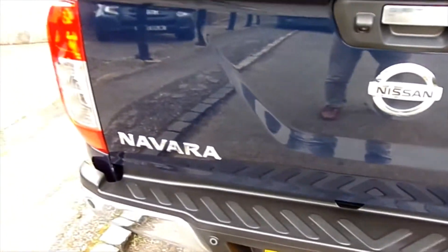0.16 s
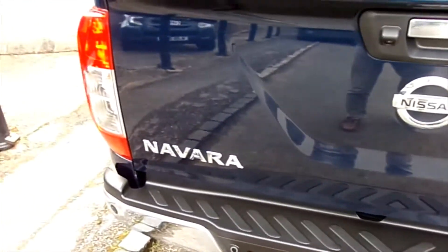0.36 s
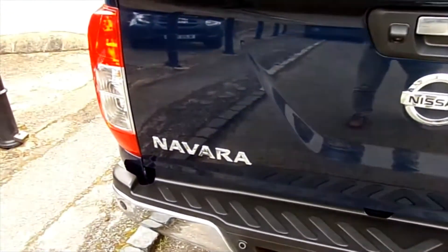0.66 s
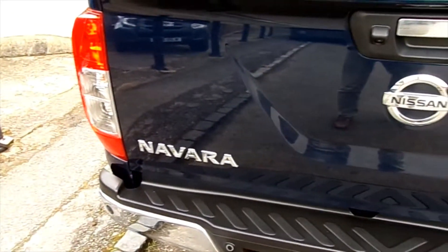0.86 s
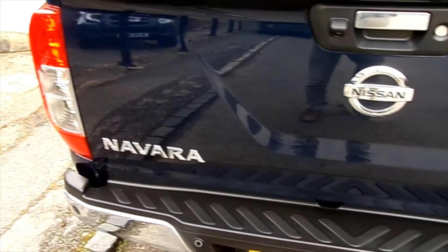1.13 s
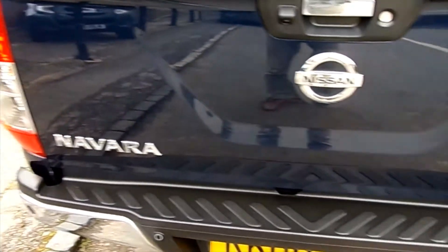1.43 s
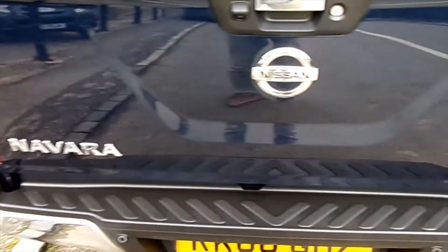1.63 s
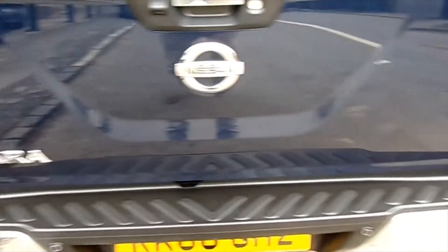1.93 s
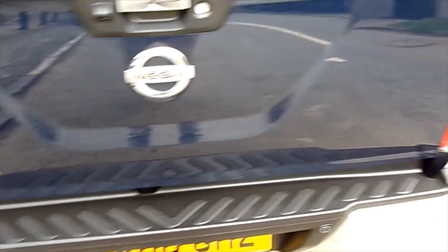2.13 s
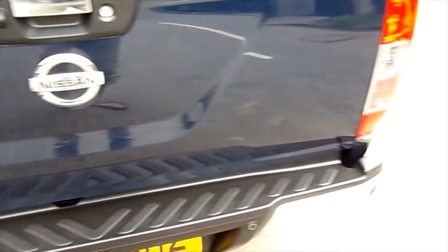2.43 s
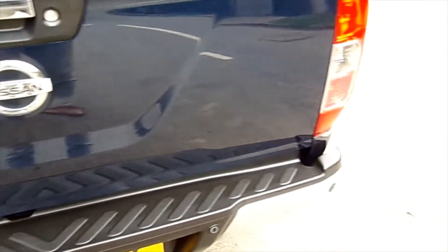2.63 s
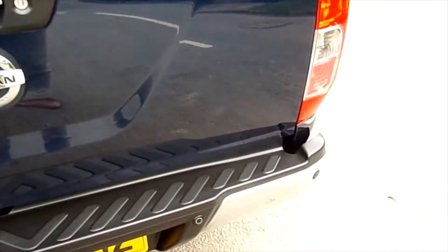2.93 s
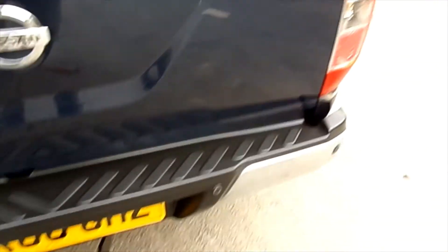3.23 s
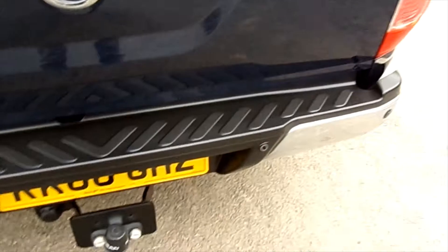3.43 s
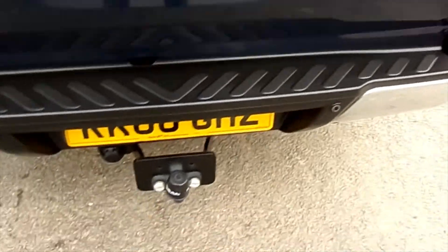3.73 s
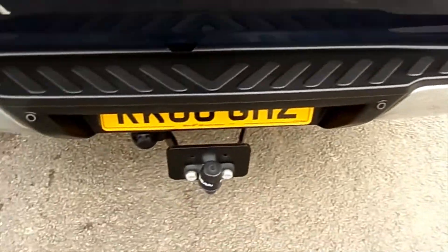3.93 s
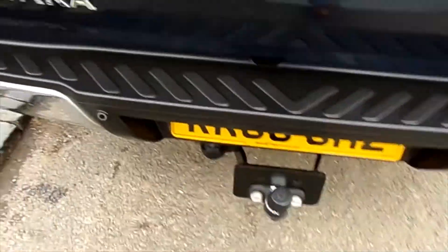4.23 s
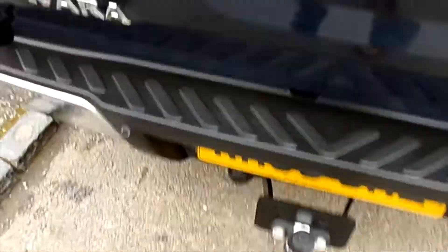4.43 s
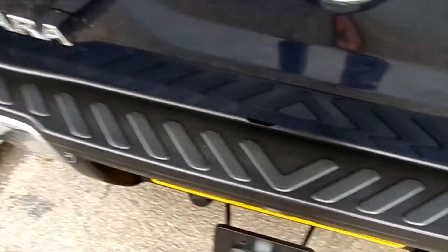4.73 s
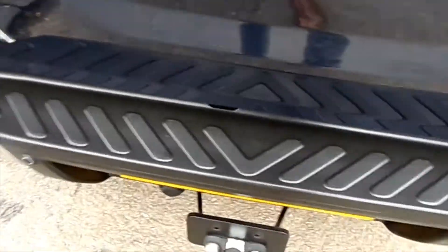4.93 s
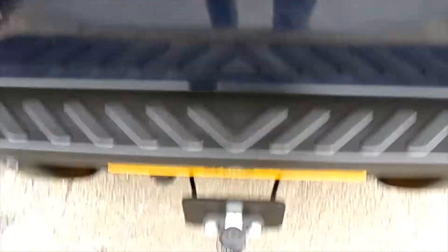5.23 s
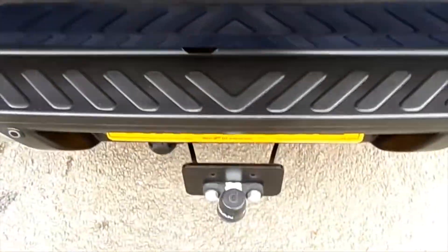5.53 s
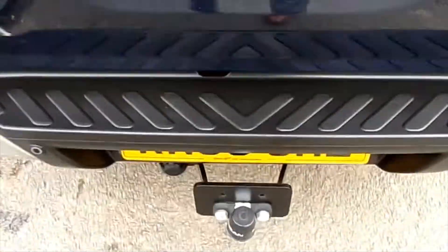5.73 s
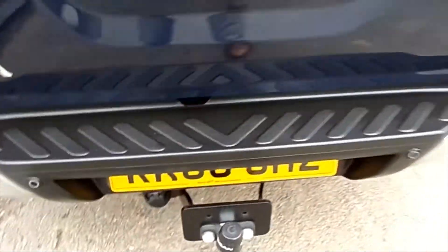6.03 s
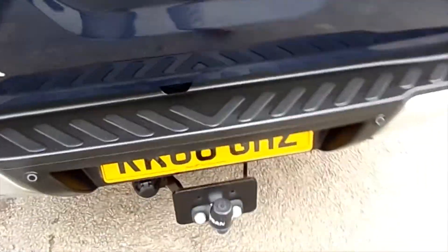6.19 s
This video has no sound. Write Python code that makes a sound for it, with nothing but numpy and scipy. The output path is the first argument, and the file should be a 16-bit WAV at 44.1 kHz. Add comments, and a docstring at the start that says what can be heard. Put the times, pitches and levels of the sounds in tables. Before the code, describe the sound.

Outdoors in a quiet street, distant cars wash past while small birds give short arched chirps and thin whistles. A few tiny handling clicks, dull knocks and soft bumps come close to the hand-held phone. Near the end a pickup's canopy door slams about a metre away, distorting the microphone, then chatters, rattles and echoes briefly as a last chirp sounds.

```python
"""Distant traffic swells and fades throughout, made of coloured noise; small birds call with gliding tones.
Early on come a few handling clicks, later joined by dull knocks and soft bumps: short bursts of noise.
Near the end a pickup's canopy door is slammed about a metre from a hand-held phone in a quiet street.
Its blows ring the panels and the latch, crash as noise and echo off the street; the microphone overloads.
The door also chatters on its seal, and loose hardware rattles out as cracks and pings."""
import sys
import numpy as np
from scipy import signal
from scipy.fft import rfft, irfft
from scipy.io import wavfile
from scipy.ndimage import uniform_filter1d

SR = 44100
rng = np.random.default_rng(int(sys.argv[2]) if len(sys.argv) > 2 else 0)


def store_pcm(level_fs):
    """Save levels as 16-bit WAV."""
    pcm = np.round(np.clip(level_fs, -1, 1) * 32767).astype(np.int16)
    wavfile.write(sys.argv[1], SR, np.atleast_2d(pcm).T)


N = 280476
TIME = np.arange(N) / SR  # seconds

# Blows of the slam: latch and seal, one hard rebound, then the door drops into its catch.
# Levels are relative, before the mix in slam(): start_s, panel_push_db, metal_crash_db
SLAM_BLOWS = [(5.8258, -40, -45), (5.8291, -29, -27), (5.8323, -34, -23), (5.839, -35, -24),
              (5.8431, -17.5, -20.5), (5.8485, -18, -17.5), (5.8528, -30.5, -20), (5.8626, -30, -41),
              (5.8965, -47, -30.5), (5.9555, -58, -33.5), (5.9597, -39.5, -38)]
# Ringing notes of the tailgate and canopy panels: pitch_hz, level_db, time_to_fall_60_db_s
PANEL_MODES = [(106, -12.5, 0.28), (178, 6, 0.048), (245.6, -6, 0.23), (313.6, -5, 0.15), (330, -2, 0.26),
               (371, -15.5, 0.16), (590, -1, 0.097), (626, -10, 0.12), (759, -14, 0.22), (903, -8, 0.11),
               (970, -10, 0.08), (1067, -7, 0.094), (1338, -24.5, 0.28), (1380, -27, 0.26)]
# Ringing notes of the steel latch and hinges: pitch_hz, level_db, time_to_fall_60_db_s
LATCH_MODES = [(2070, -14, 0.15), (2350, -2.5, 0.14), (2370, -0.5, 0.11), (2486, 4, 0.1), (2580, 0, 0.088),
               (2960, 4, 0.048), (3166, 4.5, 0.044), (3250, -19, 0.15), (3820, -1, 0.075),
               (3910, -2.5, 0.11), (4070, 4.5, 0.052), (4165, -2, 0.12), (4620, -16, 0.079),
               (4840, 2, 0.048), (4880, -14, 0.088), (6340, -6, 0.1)]
# Colour of the clashing metal: frequency_hz, level_db
CRASH_COLOUR = [(60, -4), (200, 2), (330, 1.5), (460, -13), (600, 3.5), (1050, 2), (1400, -3), (2000, -2),
                (2400, -4.5), (2800, -0.5), (4000, -3.5), (5500, -7), (7000, -7), (9000, -18), (15000, -17)]
# Colour of the street's echo: frequency_hz, level_db
STREET_COLOUR = [(30, -3), (100, 3.5), (220, 5.5), (330, 6), (450, -14.5), (620, 0), (1000, -7.5),
                 (2000, -12), (4000, -16), (7000, -20), (15000, -38)]
# From just after the main blows, through the rebound and catch, the door chatters on its seal
# at a steady rate, weakening as it goes
CHATTER_START_S, CHATTER_GAP_S = 5.878, 0.0172
CHATTER_PUSH_DB, CHATTER_CRASH_DB, CHATTER_FALL_DB_PER_S = -43, -34.5, 154

# Loudest ticks of loose hardware, before the lift in rattle(): start_s, level_db, pitch_hz
RATTLE_TICKS = [(5.9445, -50, 6400), (5.9755, -47, 3900), (6.0068, -42.5, 3210), (6.0472, -44, 3900),
                (6.0805, -52.5, 3900)]
# Colour of the rattle's cracks: frequency_hz, level_db
RATTLE_COLOUR = [(200, 8), (1100, -3), (1900, -7), (3200, 5), (4000, -4), (4900, -1), (6600, 0), (9000, -1),
                 (15000, -11)]
# Fainter ticks follow at uneven gaps as the hardware settles
SETTLE_START_S, SETTLE_GAP_S = 6.102, 0.024  # the gap is an average
SETTLE_DB, SETTLE_FALL_DB_PER_S, SETTLE_HZ = -57.5, 29, 6120

# Small clicks of handling: start_s, level_db, pitch_hz
HANDLING_CLICKS = [(.592, -53, 6700), (.5955, -46.5, 4720), (.6005, -47.5, 2660), (.6075, -52, 2920),
                   (.611, -45.5, 4780), (3.028, -45.5, 3020), (3.0402, -47.5, 3200), (4.7415, -56.5, 5330),
                   (4.8762, -48.5, 6120), (4.9075, -56, 5100)]
# Colour of the clicks: frequency_hz, level_db
CLICK_COLOUR = [(200, -8), (1100, -6), (1600, 2), (2100, 5.5), (3100, 1), (3900, -3.5), (4900, 5),
                (5700, -10), (6600, 3.5), (9000, -28), (15000, -20)]
# Dull knocks as the door is moved: start_s, level_db
DOOR_KNOCKS = [(3.042, -58), (4.8785, -41), (4.8845, -50), (4.9085, -49.5)]
# Colour of the knocks: frequency_hz, level_db
KNOCK_COLOUR = [(40, -7), (150, -31), (280, 12.5), (450, 4), (700, 12), (1200, -1), (2300, 6.5), (3300, 1),
                (5000, -15), (12000, -49)]
# Soft bumps of the hand-held phone: start_s, level_db
PHONE_BUMPS = [(3.095, -52), (3.622, -58), (4.785, -67), (4.866, -51), (4.92, -51.5)]
# Colour of the bumps: frequency_hz, level_db
BUMP_COLOUR = [(20, -2), (50, 0), (130, -12), (200, 3), (350, -25), (1000, -41)]

# Arched chirps, each led in by a lisp: start_s, level_db, top_pitch_hz, length_s, lisp_against_chirp_db
ARCHED_CHIRPS = [(0.793, -46.5, 4227, 0.12, -10), (1.57, -70.5, 3600, .043, -8),
                 (1.862, -69, 3710, .04, -3), (2.411, -49.5, 4230, .11, -8.5),
                 (3.743, -68.5, 3620, 0.054, -3), (3.987, -47.5, 4274, .11, -14.5),
                 (5.342, -50.5, 4103, .11, -10.5), (5.614, -65.5, 3070, 0.095, -22),
                 (6.195, -50, 4220, 0.098, -15.5)]
ARCH_DEPTH, ARCH_SKEW = 0.26, 0.78  # share of the top pitch lost at the ends; under 1 the top comes early
# The chirp's second voice: top against the first's; share of it lost at the ends
UNDER_RATIO, UNDER_DEPTH = 0.94, 0.27
# Each lisp starts just ahead of its chirp and runs into it
LISP_LEAD_S, LISP_S = 0.036, 0.056
# Lisp start against the chirp's top; shares by which its two voices climb
LISP_RATIO, LISP_CREEP, LISP_RISE = 1.115, 0.063, 0.3
# Short, clean chips: start_s, level_db, top_pitch_hz, length_s
CLEAN_CHIPS = [(.414, -58.5, 4290, 0.026), (2.046, -63, 4300, .04), (3.355, -68, 4050, 0.035)]
CHIP_DEPTH = 0.09  # share of the top pitch lost at the ends
# Thin whistles that drop onto a held note: start_s, level_db, held_pitch_hz, length_s
THIN_WHISTLES = [(3.15, -75.5, 6510, 0.1), (5.19, -68.5, 6400, 0.22), (5.425, -64.5, 6347, .2),
                 (5.666, -64.5, 6530, 0.16), (6.06, -60.5, 5390, .095)]
WHISTLE_DROP, WHISTLE_DROP_S = 0.2, 0.023  # starts this share above the held note; time constant of the fall

# Cars on a distant road; swell_s sets how slowly each comes and goes:
# nearest_s, swell_s, tyre_roar_db, hiss_db, engine_rumble_db, exhaust_drone_db
PASSING_CARS = [(1.15, 0.47, -56, -62, -60.5, -58.5), (2.3, .4, -59.5, -60.5, -73.5, -62.5),
                (3.25, 0.31, -71, -64.5, -68, -65), (3.8, 0.43, -63.5, -65.5, -72, -72),
                (4.5, 0.92, -62, -74.5, -63.5, -73.5), (6.3, 0.7, -60, -66.5, -63, -76)]
EXHAUST_LAG_S = 0.46  # the exhaust points backwards, so it is loudest after the car has passed
SCREENING = 1.566  # houses make the level fall faster than 1 / distance
TOWN_ROAR_DB, TOWN_HISS_DB, TOWN_RUMBLE_DB = -71, -65.5, -70.5  # steady wash behind the cars
HOWL_DB, HOWL_SWELL_S = -55.5, 0.21  # the first car's tyres howl while it is nearest
# Colour of the tyre roar: frequency_hz, level_db
TYRE_COLOUR = [(300, -32), (500, -14.5), (615, 1.5), (680, -6.5), (775, 0), (880, -2.5), (1040, 0),
               (1250, -9), (1700, -23), (3000, -50.5)]
# Colour of the road hiss: frequency_hz, level_db
HISS_COLOUR = [(700, -14.5), (1300, 6), (1800, 2), (2500, -2), (3400, -6.5), (4100, -10), (5000, -16.5),
               (6500, -18), (9000, -42), (15000, -14.5)]
# Colour of the engine rumble: frequency_hz, level_db
RUMBLE_COLOUR = [(20, -34), (45, -17), (90, -6.5), (150, -5), (215, -3), (270, -0.5), (350, -7), (480, -10),
                 (800, -32)]
# Colour of the exhaust drone: frequency_hz, level_db
DRONE_COLOUR = [(70, -28), (130, -8.5), (195, -1), (222, 6.5), (245, 6), (290, -60)]
# Colour of the tyre howl: frequency_hz, level_db
HOWL_COLOUR = [(500, -28), (620, 6.5), (680, -3.5), (755, 9), (790, 11), (860, -1), (1020, 0), (1300, -77)]

# The phone's microphone, with two narrow notches and a steep shelf: frequency_hz, level_db
MIC_RESPONSE = [(20, 0), (3590, 0), (3680, -15), (3770, 0), (4230, 0), (4380, -19), (4520, 0), (6700, 0),
                (7400, -9), (8000, -23), (15000, -21)]
OVERLOAD_DB, SELF_NOISE_DB, TOP_HZ = -19, -89.5, 15800


def slam():
    """Each blow rings the panels and clashes the steel latch; the street's echo dies away more slowly."""
    times, push_db, crash_db = np.vstack([SLAM_BLOWS, chatter()]).T
    push = impulses(times, push_db)
    clash = impulses(times, crash_db)
    panels = signal.fftconvolve(push, ring(PANEL_MODES))[:N]
    latch = signal.fftconvolve(clash, ring(LATCH_MODES))[:N]
    metal = noise(CRASH_COLOUR) * fade(clash, t60=0.033, rise=0.00054)
    echo = noise(STREET_COLOUR) * fade(push, t60=0.57, rise=0.017)
    return undb(-3.5) * panels + undb(-16.5) * latch + undb(0.5) * metal + undb(-18.5) * echo


def chatter(count=8, scatter_db=1.5):
    """Small bounces of the door on its seal lose strength on average, in rows like those of the slam."""
    t = CHATTER_GAP_S * np.arange(count)
    db = scatter_db * rng.standard_normal((count, 2)) + [CHATTER_PUSH_DB, CHATTER_CRASH_DB]
    db -= CHATTER_FALL_DB_PER_S * t[:, None]
    return np.column_stack([CHATTER_START_S + t, db])


def rattle():
    """Loose hardware knocks against itself after the slam; each contact cracks and pings."""
    rows = list(RATTLE_TICKS) + settling()
    return undb(3) * ticks(rows, RATTLE_COLOUR, t60=0.016, tone_db=-4, tone_t60=0.03, ring_db=-15)


def settling(count=6, uneven=0.13, scatter_db=0.5, detune=0.069):
    """The last faint hardware ticks vary in gap, level and pitch, in rows like those of the rattle."""
    late, loud, sharp = rng.standard_normal((count, 3)).T
    t = SETTLE_GAP_S * (np.arange(count) + uneven * late)
    db = SETTLE_DB - SETTLE_FALL_DB_PER_S * t + scatter_db * loud
    hz = SETTLE_HZ * (1 + detune * sharp)
    return list(zip(SETTLE_START_S + t, db, hz))


def clicks():
    """Small hard contacts of handling, each a crack with a brief ping."""
    return ticks(HANDLING_CLICKS, CLICK_COLOUR, t60=0.02, tone_db=1, tone_t60=0.015, ring_db=-26)


def knocks():
    """Moving the door gives dull thuds with no clear pitch."""
    return taps(DOOR_KNOCKS, KNOCK_COLOUR, t60=0.071, ring_db=-18, ring_t60=0.15)


def bumps():
    """The hand-held phone is bumped softly, giving mostly low-pitched noise."""
    return taps(PHONE_BUMPS, BUMP_COLOUR, t60=0.12, ring_db=-12, ring_t60=0.21)


def birds(echo_db=-7, echo_t60=0.47, wall_db=-6, wall_s=0.015, slide_db=-1.5, under_db=-6):
    """Small birds repeat a lisp and an arched chirp, others chip or whistle thinly; house fronts scatter them."""
    # Lisp and chirp have two voices: each side of the bird's voice box glides on its own
    lisps = [(s - LISP_LEAD_S, db + lisp_db, hz * LISP_RATIO, LISP_S)
             for s, db, hz, _, lisp_db in ARCHED_CHIRPS]
    upper = [row[:4] for row in ARCHED_CHIRPS]
    under = [(s, db + under_db, hz * UNDER_RATIO, length) for s, db, hz, length in upper]
    dry = song(lisps, climb(LISP_CREEP), attack=.15, release=.5, buzz_hz=170, buzz_depth=.008, rasp=.014)
    slide = song(lisps, climb(LISP_RISE), attack=.4, release=.3, buzz_hz=170, buzz_depth=.04, rasp=.045)
    dry += undb(slide_db) * slide
    dry += song(upper, arch(ARCH_DEPTH), attack=.3, release=.33, buzz_hz=440, buzz_depth=.055, rasp=.017)
    dry += song(under, arch(UNDER_DEPTH), attack=.1, release=.12, buzz_hz=440, buzz_depth=.02, rasp=.02)
    dry += song(CLEAN_CHIPS, arch(CHIP_DEPTH), attack=.2, release=.2, buzz_hz=170, buzz_depth=.002, rasp=.003)
    dry += song(THIN_WHISTLES, drop, attack=.05, release=.3, buzz_hz=58.4, buzz_depth=.003, rasp=.008)
    # The nearest wall returns a late copy that overlaps each glide and beats with it
    near = np.interp(TIME - wall_s, TIME, dry)
    walls = rng.standard_normal(SR) * np.exp(-np.log(1000) * TIME[:SR] / echo_t60)
    echo = signal.fftconvolve(dry, walls / np.linalg.norm(walls))[:N]
    return dry + undb(wall_db) * near + undb(echo_db) * echo


def song(calls, glide, attack, release, buzz_hz, buzz_depth, rasp):
    """Gliding notes, shaken in pitch by a fast trill and an uneven rasp; attack and release are length shares."""
    out = np.zeros(N)
    for start, db, pitch, length in calls:
        t = TIME[:int(length * SR)]
        done = t / length
        jitter = unit(butter(rng.standard_normal(SR), 400, "low"))[:len(t)]
        trill = np.sin(2 * np.pi * (buzz_hz * t + rng.random()))
        hz = pitch * glide(t, done) * (1 + buzz_depth * trill + rasp * jitter)
        envelope = np.minimum(np.minimum(done / attack, (1 - done) / release), 1)
        call = undb(db) * envelope * np.sin(2 * np.pi * np.cumsum(hz) / SR)
        first = int(start * SR)
        out[first:first + len(t)] += call[:N - first]
    return out


def arch(depth):
    """A glide that rises to the top pitch and falls back, `depth` lower at both ends."""
    return lambda t, done: 1 - depth * (1 - np.sin(np.pi * done ** ARCH_SKEW))


def climb(share):
    """A glide that rises evenly by `share` of its pitch."""
    return lambda t, done: 1 + share * done


def drop(t, done):
    """A glide that falls quickly onto a held note."""
    return 1 + WHISTLE_DROP * np.exp(-t / WHISTLE_DROP_S)


def traffic(flutter_db=0.47):
    """Cars some streets away swell and fade over the town's wash: tyres first, then engine and exhaust."""
    nearest, swell_s, roar_db, hiss_db, rumble_db, drone_db = np.transpose(PASSING_CARS)
    ahead = np.array([swell(s, width) for s, width in zip(nearest, swell_s)])
    behind = np.array([swell(s + EXHAUST_LAG_S, width) for s, width in zip(nearest, swell_s)])

    def together(db, gains):
        """Separate cars add by power."""
        return np.sqrt(undb(db) ** 2 @ gains ** 2)

    layers = [(TYRE_COLOUR, np.hypot(together(roar_db, ahead), undb(TOWN_ROAR_DB))),
              (HISS_COLOUR, np.hypot(together(hiss_db, ahead), undb(TOWN_HISS_DB))),
              (RUMBLE_COLOUR, np.hypot(together(rumble_db, behind), undb(TOWN_RUMBLE_DB))),
              (DRONE_COLOUR, together(drone_db, behind)),
              (HOWL_COLOUR, undb(HOWL_DB) * swell(nearest[0], HOWL_SWELL_S))]
    # The level of each layer wanders slightly on its own
    return sum(noise(colour) * gain * undb(flutter_db * walk(11)) for colour, gain in layers)


def swell(nearest_s, swell_s):
    """Gain of a car driving past on a straight road, 1 when it is nearest."""
    return np.hypot(1, (TIME - nearest_s) / swell_s) ** -SCREENING


def ticks(rows, colour, t60, tone_db, tone_t60, ring_db):
    """Light contacts of hard parts: each cracks and pings at its own pitch."""
    out = taps([row[:2] for row in rows], colour, t60, ring_db, ring_t60=0.1)
    for s, db, hz in rows:
        first = int(s * SR)
        out[first:first + SR] += ring([(hz, db + tone_db, tone_t60)])[:N - first]
    return out


def taps(rows, colour, t60, ring_db, ring_t60):
    """Small impacts: a short crack and a weaker after-ring, both of noise."""
    blows = impulses(*np.transpose(rows))
    crack = fade(blows, t60, rise=0.00036)
    after_ring = undb(ring_db) * fade(blows, ring_t60, rise=0.0025)
    return noise(colour) * (crack + after_ring)


def ring(modes):
    """One second of free vibration; neighbours in the list move in opposite directions, so close pairs swell."""
    t = TIME[:SR]
    out = np.zeros(SR)
    for k, (hz, db, t60) in enumerate(modes):
        decay = np.exp(-np.log(1000) * t / t60)
        out += (-1) ** k * undb(db) * np.sin(2 * np.pi * hz * t) * decay
    return out


def fade(blows, t60, rise):
    """Amplitude of a dense ring: each blow adds energy, which spreads in `rise` s and then drains away."""
    keep = np.exp(-np.log(1e6) / (t60 * SR))
    spread = np.exp(-1 / (rise * SR))
    stored = signal.lfilter([1], [1, -keep], blows ** 2 + 1e-24)  # the tiny floor avoids zero energy
    return np.sqrt(signal.lfilter([1 - spread], [1, -spread], stored))


def impulses(times, db):
    """One spike for each blow."""
    return np.bincount((np.asarray(times) * SR).astype(int), undb(db), N)[:N]


def noise(points):
    """Noise of rms 1, coloured by a spectrum."""
    return unit(irfft(rfft(rng.standard_normal(N)) * response(points), N))


def response(points):
    """Gain in every FFT bin of a spectrum given as (frequency_hz, level_db) points."""
    hz, db = np.transpose(points)
    bins_hz = np.arange(N // 2 + 1) * SR / N
    return undb(np.interp(np.log(bins_hz + 1), np.log(hz), db))  # + 1 avoids the log of zero


def walk(rate):
    """Slow random wander with a spread near 1, from `rate` random steps a second, smoothed."""
    k = int(SR / rate)
    steps = np.repeat(rng.standard_normal(N // k + 1), k)
    return 1.3 * uniform_filter1d(steps, k)[:N]


def butter(x, hz, kind, order=2):
    """Low- or high-pass filter."""
    return signal.sosfilt(signal.butter(order, hz, kind, fs=SR, output="sos"), x)


def unit(x):
    """Scale to rms 1."""
    return x / np.sqrt(np.mean(x ** 2))


def undb(db):
    """Decibels to gain."""
    return 10 ** (np.asarray(db) / 20)


def scene():
    """Everything that reaches the phone."""
    door = slam() + rattle() + knocks()
    handling = clicks() + bumps()
    return (door + handling + birds() + traffic())[None]


def record(dry):
    """The microphone colours the sound and overloads on the slam; faint hiss is added and the top is cut."""
    heard = irfft(rfft(dry) * response(MIC_RESPONSE), N)
    limit = undb(OVERLOAD_DB)
    clipped = np.clip(heard, -limit, limit)
    hiss = undb(SELF_NOISE_DB) * noise([(9000, -4.0), (12000, -12.0), (15000, 3.5)])
    top_cut = signal.ellip(10, 0.2, 70, TOP_HZ, fs=SR, output="sos")
    return signal.sosfilt(top_cut, butter(clipped, 45, "high") + hiss)


dry = scene()
out = record(dry)
store_pcm(out)
```